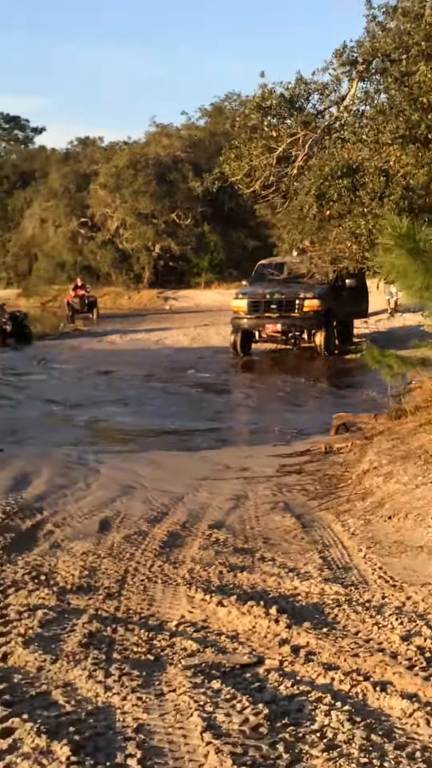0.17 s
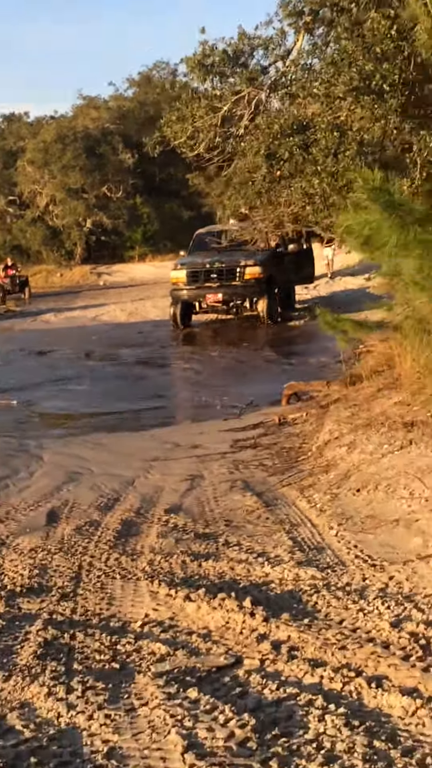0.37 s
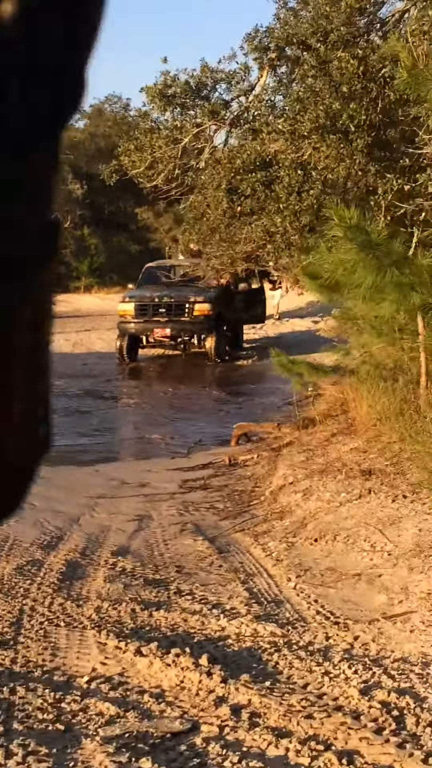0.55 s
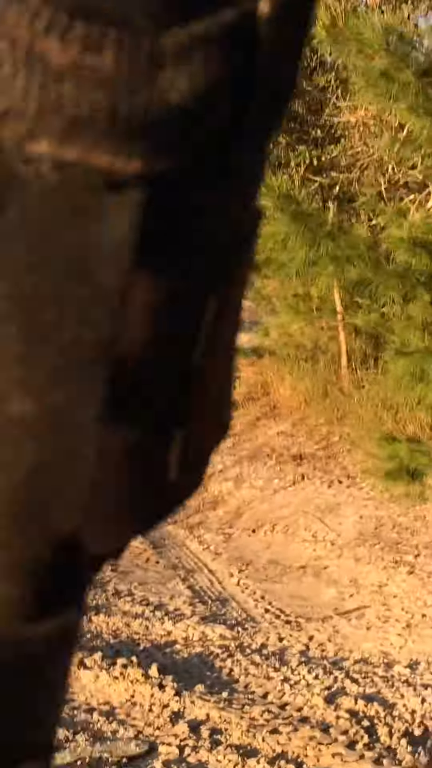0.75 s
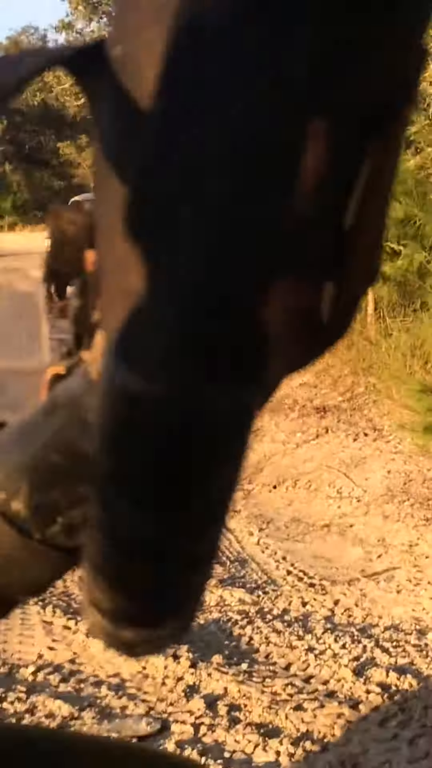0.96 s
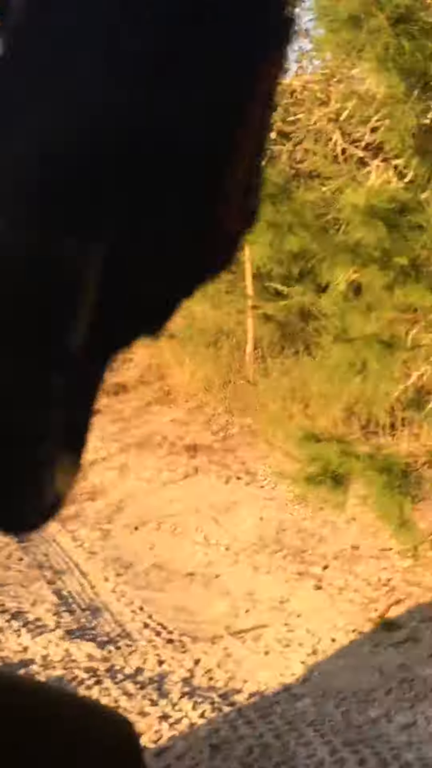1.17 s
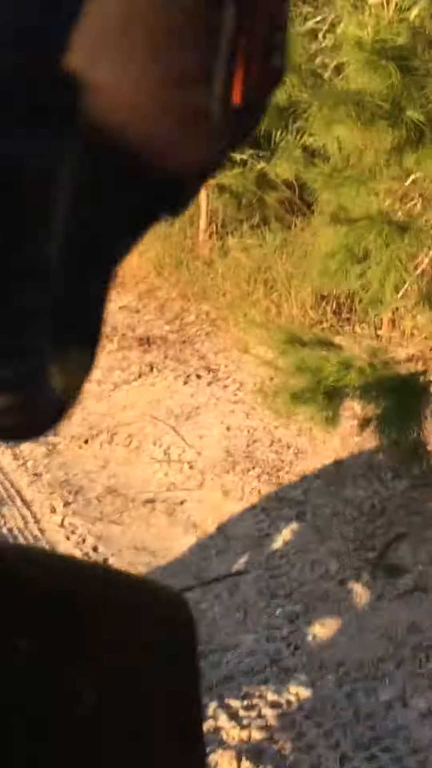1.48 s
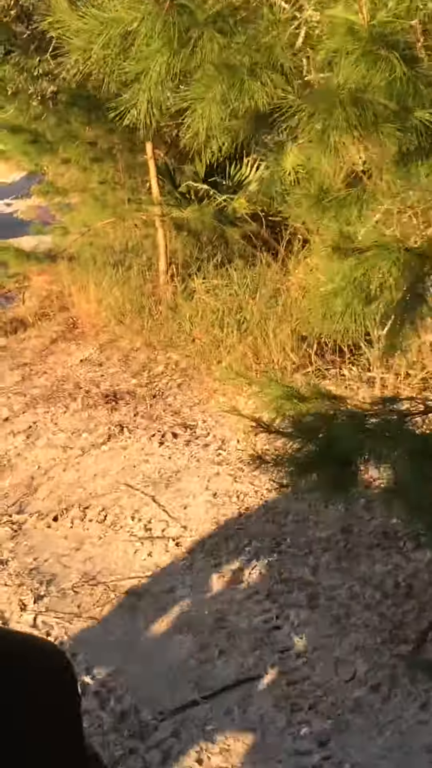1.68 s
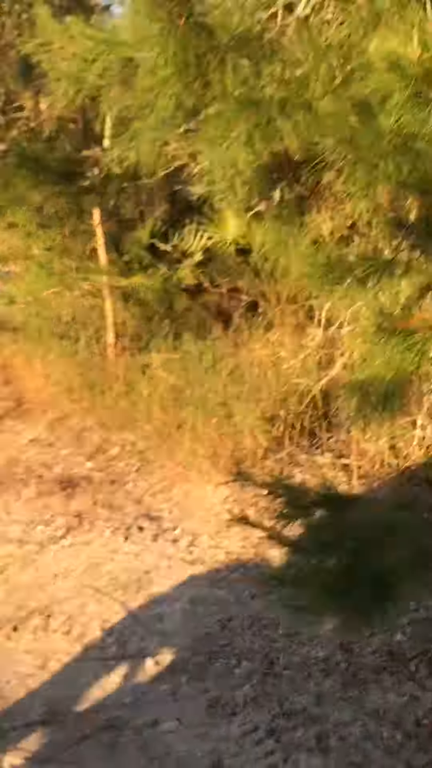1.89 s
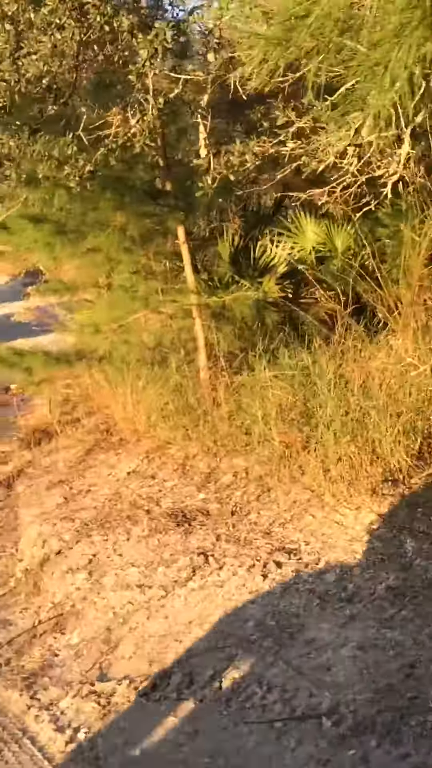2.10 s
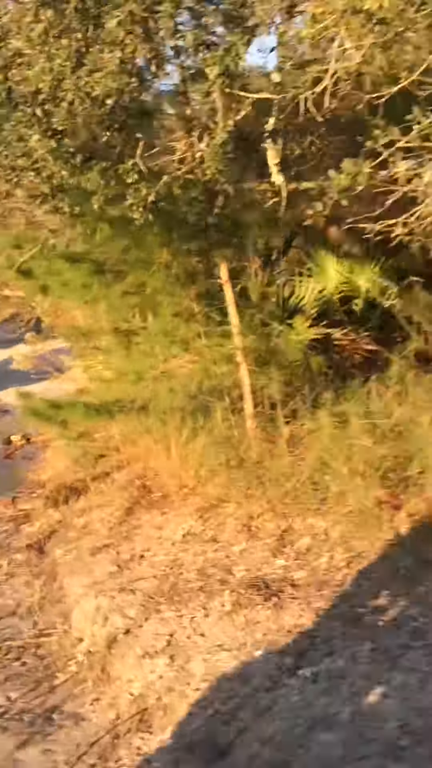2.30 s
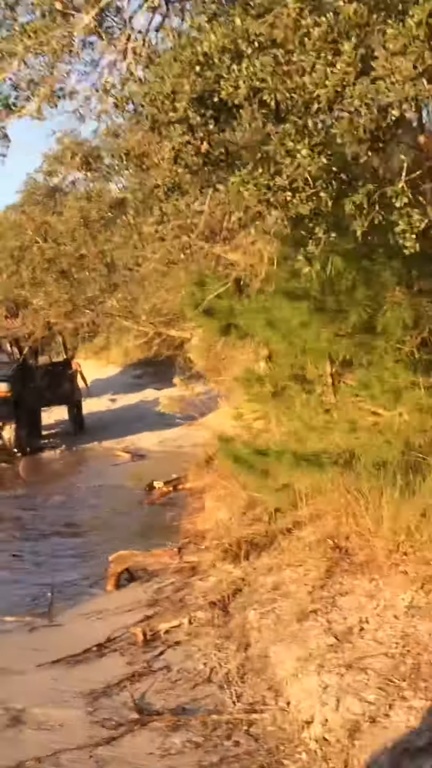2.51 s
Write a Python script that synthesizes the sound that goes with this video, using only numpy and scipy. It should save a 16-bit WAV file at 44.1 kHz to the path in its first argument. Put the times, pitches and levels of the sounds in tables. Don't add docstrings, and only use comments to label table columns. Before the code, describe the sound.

A big truck engine throbs low and rough, its pitch falling from the start to about 0.8 s, blipping up near 1.1 s, then sagging and stumbling around 1.6-1.85 s in lumpy beats. At 2 s a dull driveline clunk leads into a hard, raspy rev held to the end at 2.65 s. Loose metal jingles intermittently, panels buzz, and faint hiss surrounds it in dry open air.

```python
import sys
import numpy as np
from scipy import signal
from scipy.io import wavfile
from scipy.ndimage import uniform_filter1d

SR = 44100
rng = np.random.default_rng(int(sys.argv[2]) if len(sys.argv) > 2 else 0)


def boost(x):
    u = np.asarray(x, float) / 20
    return 10 ** u


def dump_mix(stems):
    frames = np.atleast_2d(stems).T
    limited = np.clip(frames, -1, 1)
    pcm = np.round(limited * 32767).astype(np.int16)
    wavfile.write(sys.argv[1], SR, pcm)


N = 116865


def col(table, k):
    table = np.array(table, float)
    return np.interp(np.arange(N) / SR, table[:, 0], table[:, k])


def unit(x):
    return x / np.sqrt(np.mean(x ** 2))


def band(x, hz, width):
    return signal.lfilter(*signal.iirpeak(min(hz, 0.45 * SR), hz / width, fs=SR), x)


def band_twice(x, hz, width):
    return band(band(x, hz, width), hz, width)


def noise():
    return rng.standard_normal(N)


def walk(rate):
    hold = int(SR / rate)
    levels = np.repeat(rng.standard_normal(N // hold + 1), hold)
    return 1.322 * uniform_filter1d(uniform_filter1d(levels, hold), hold)[:N]


def bump(centre_s, length_s):
    return np.exp(-((np.arange(N) / SR - centre_s) / length_s) ** 2)


def air(full):
    hiss_db, crackle_db, ticks_per_s = -58.5, -48, 1500
    happens = rng.random(N) < ticks_per_s / SR
    ticks = happens * noise() * boost(2.1 * rng.exponential(size=N))
    ticks = band(ticks, 6100, 1500) + 0.6 * band(ticks, 6700, 6000)
    hiss = boost(hiss_db) * unit(band(noise(), 7000, 7300))
    return hiss + boost(crackle_db + 2 * walk(18)) * full * unit(ticks)


def panels():
    # centre in seconds, length in seconds, pitch in Hz, level in dB.
    buzzes = [(0.444, 0.058, 1420, -38), (0.963, 0.027, 1426, -38), (1.992, 0.037, 478, -33),
              (1.995, .025, 1069, -35), (1.998, 0.038, 1380, -49), (2.003, 0.022, 3950, -40.5),
              (2.148, 0.061, 1388, -37), (2.194, 0.12, 769, -33), (2.252, 0.23, 433, -35),
              (2.4, 0.17, 919, -40.5), (2.2, 0.092, 1072, -40), (2.265, 0.018, 1200, -33),
              (2.325, 0.12, 1432, -35), (2.334, 0.042, 1350, -38.5), (2.45, 0.067, 1441, -34),
              (2.543, 0.065, 1407, -42)]
    out = np.zeros(N)
    for centre_s, length_s, hz, db in buzzes:
        tone = unit(band(noise(), hz, 14))
        out += boost(db) * bump(centre_s, length_s) * tone
    return out


def clunk():
    knock = unit(band_twice(noise(), 1000, 2200))
    return boost(-29) * bump(1.992, 0.014) * knock


def jingle():
    # start in seconds, peak in dB, main ring in Hz, length in seconds.
    contacts = [(0.0094, -30, 5700, 0.01), (0.083, -32, 5600, 0.012), (0.727, -50, 5960, 0.01),
                (0.778, -35.5, 6170, 0.013), (0.804, -33.5, 7200, 0.013), (0.862, -41, 5700, 0.01),
                (0.901, -33.5, 5510, 0.013), (0.9163, -34.5, 5330, 0.014), (0.9594, -38, 5440, 0.011),
                (1.618, -34.5, 5600, 0.028), (1.648, -32.5, 7700, 0.0078), (1.6693, -27.5, 5800, 0.014),
                (1.678, -28.5, 5970, 0.0063), (1.685, -32, 6300, 0.015), (1.99, -47, 6000, 0.0085),
                (2.062, -27, 5820, 0.017), (2.083, -27.5, 7230, 0.01), (2.162, -35, 6300, 0.0073),
                (2.55, -33, 8030, 0.014), (2.595, -31, 5800, 0.018)]
    # pitch in Hz, level in dB, decay time t60 in seconds.
    modes = [(3950, -8, 0.022), (5450, -8, 0.033), (6070, -3, .04), (6280, -15, 0.056), (7000, -8, .04),
             (7600, -6, .04), (9740, -14, .03), (13200, -17, .025)]
    jingle_db, crack_db, main_t60_s, touch_rise_s = 0.5, -2, 0.043, 0.0019
    span = 6000
    out = np.zeros(N)
    for start_s, peak_db, main_hz, length_s in contacts:
        start = int(start_s * SR)
        age = np.arange(min(span, N - start)) / SR
        grit = rng.standard_normal(len(age)) * boost(0.84 * rng.exponential(size=len(age)))
        touch = grit * (1 - np.exp(-age / touch_rise_s)) * np.exp(-(age / length_s) ** 2)
        ring = boost(crack_db) * unit(band(touch, 4700, 7000))
        ring = ring + unit(band(touch, main_hz, 2.5 / main_t60_s))
        for hz, db, t60 in modes:
            detuned_hz = hz * (1 + 0.013 * rng.standard_normal())
            ring = ring + boost(db) * unit(band(touch, detuned_hz, 1 / t60))
        out[start:start + span] += boost(peak_db + jingle_db) * ring / np.abs(ring).max()
    return out


def roar(cycle, full):
    # frequency in Hz, level in dB per Hz.
    spectrum = [(140, -31), (230, -8.5), (447, -13), (581, -17.5), (1300, -14.5), (1440, -10), (3110, -34),
                (6040, -33.5), (15000, -48.5)]
    # centre in Hz, width in Hz, level in dB.
    casing = [(409, 150, -5), (792, 87, -11.5), (1116, 90, -9.5), (1404, 240, -7), (6000, 660, -28.5)]
    gate, flicker_db, brighter_db = 0.15, 2.5, 0.5
    puff = 1 - gate + gate * 3 * np.exp(-(cycle % 1) / 0.33)
    curve_hz, curve_db = np.array(spectrum).T
    gas = 0
    for hz in 240 * 2 ** np.arange(0, 6.1, 1 / 3):
        db = np.interp(np.log(hz), np.log(curve_hz), curve_db) + 10 * np.log10(hz)
        db = db + flicker_db * walk(14) + brighter_db * full * np.log2(hz / 2700)
        gas = gas + boost(db) * unit(band_twice(noise(), hz, hz / 3))
    out = unit(gas)
    for hz, width_hz, db in casing:
        out = out + boost(db) * unit(band(noise(), hz, width_hz))
    return unit(out * puff)


def exhaust_pipe(x):
    # centre in Hz, width in Hz, level in dB.
    resonances = [(99.6, 50, 3.5), (189.6, 13, -1.5), (285, 42.5, -17.5), (423, 154, -29)]
    return unit(sum(boost(db) * band_twice(x, hz, width_hz * 1.36) for hz, width_hz, db in resonances))


def throb(hz, cycle, full):
    # order in multiples of the cycle rate, level in dB.
    part_orders = [(1, -19), (2, -11.5), (3, -10), (4, -8), (5, 2), (6, -11), (7, -17), (8, -16.5),
                   (9, -21.5), (10, -22), (11, -23), (12, -35), (13, -32.5), (14, -23.5)]
    # order in multiples of the cycle rate, level in dB.
    full_orders = [(1, -15), (2, 2.5), (3, -27), (4, -3), (5, 0.5), (6, -10), (7, -18), (8, -16),
                   (9, -15.5), (10, -23.5), (11, -15), (12, -16), (13, -16.5), (14, -19)]
    wander_db, weak_wander, wander_rad, spread_rad = 2.2, 0.6, 0.35, 0.349
    silencer_hz, silencer_width_hz, silencer_db = 187, 13, 14
    pulse_scatter_db, pipe_db, rumble_db, full_pipe_db, ground_db = 2, -9.5, -10, -4.5, -18.5
    orders = 0
    for (k, part_db), (_, full_db) in zip(part_orders, full_orders):
        unsteady_db = wander_db * (1 + weak_wander * abs(max(part_db, full_db)) / 10)
        db = part_db + (full_db - part_db) * full + unsteady_db * walk(6.81)
        db = db + silencer_db / (1 + ((k * hz - silencer_hz) / silencer_width_hz) ** 2)
        phase = 2 * np.pi * k * cycle + spread_rad * (k - 5) ** 2 + wander_rad * walk(12)
        orders = orders + boost(db) * np.cos(phase)

    turn = np.floor(cycle).astype(int)
    size = boost(pulse_scatter_db * rng.standard_normal(200))[turn]
    pulses = np.diff(turn, prepend=0) * size
    rough = boost(pipe_db) * exhaust_pipe(pulses) + boost(rumble_db) * exhaust_pipe(noise())
    ground = band(noise(), 59, 35) - band(noise(), 145, 80)
    rough = rough + boost(ground_db) * unit(ground)

    stumble = bump(1.633, 0.13)
    lumps = 1 - 0.9 * bump(1.86, 0.13) * np.sin(np.pi * (cycle - 0.3)) ** 2
    steady = unit(orders) * lumps * boost(-12 * stumble)
    return steady + rough * boost(full_pipe_db * (full - stumble))


def scene():
    # time in seconds, cycle rate in Hz.
    speed = [(0, 28.6), (.2, 25.8), (.33, 23.6), (.5, 22.4), (.65, 19.4), (.8, 17.5), (.9, 18.6), (1.0, 23),
             (1.08, 26), (1.16, 26.8), (1.32, 23.6), (1.47, 21.6), (1.78, 16.5), (1.93, 21), (2.04, 31),
             (2.15, 33.2), (2.32, 34), (2.65, 31.2)]
    # time in seconds, throb level in dB, load (roar) level in dB.
    effort = [(0.0, -16, -31.5), (0.29, -11.5, -38), (0.79, -14.5, -40.5), (1.06, -11.5, -32.5),
              (1.12, -16.5, -32.5), (1.34, -11, -35.5), (1.65, -20, -40), (1.67, -16, -38),
              (1.76, -17.5, -40.5), (1.8, -11, -40.5), (1.93, -12, -33.5), (2.0, -11.5, -26),
              (2.01, -15.5, -28), (2.28, -14.5, -26.5), (2.57, -17.5, -32), (2.65, -20, -29)]
    throttle_opens_s, opening_s, roar_db = 1.975, 0.015, 2
    hz = uniform_filter1d(col(speed, 1), size=2000) * (1 + 0.007 * walk(20))
    cycle = 0.3 + np.cumsum(hz) / SR
    full = 1 / (1 + np.exp(-(np.arange(N) / SR - throttle_opens_s) / opening_s))
    engine = boost(col(effort, 1)) * throb(hz, cycle, full)
    engine = engine + boost(col(effort, 2) + roar_db) * roar(cycle, full)
    return (engine + panels() + air(full) + jingle() + clunk())[None]


def band_limit(x):
    return signal.sosfilt(signal.butter(12, 15260, fs=SR, output="sos"), x)


def record(dry):
    low_cut = signal.butter(2, 40, "high", fs=SR, output="sos")
    top_cut = signal.ellip(10, 0.2, 80, 15300, fs=SR, output="sos")
    x = signal.sosfilt(low_cut, dry)
    x = np.tanh(1.1 * x) / 1.1
    return band_limit(signal.sosfilt(top_cut, x))


dry = scene()
out = record(dry)
dump_mix(out)
```